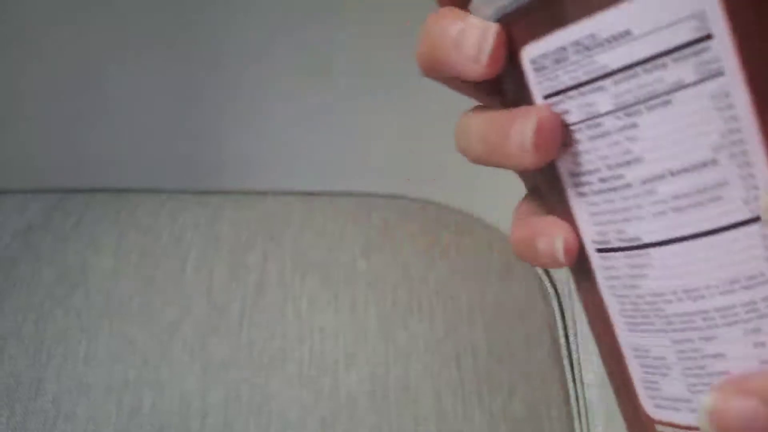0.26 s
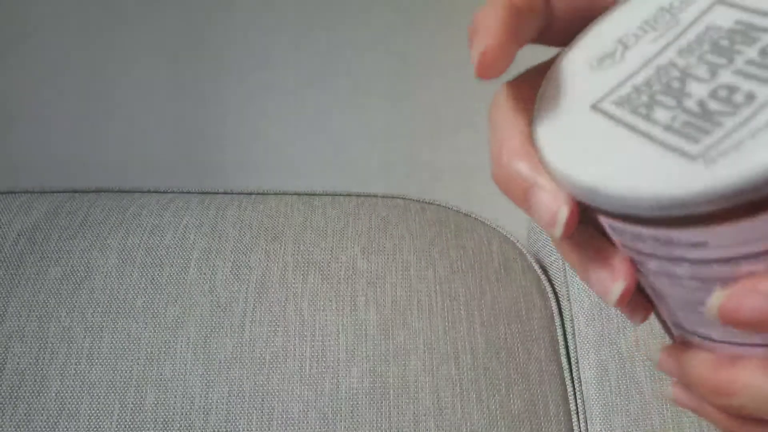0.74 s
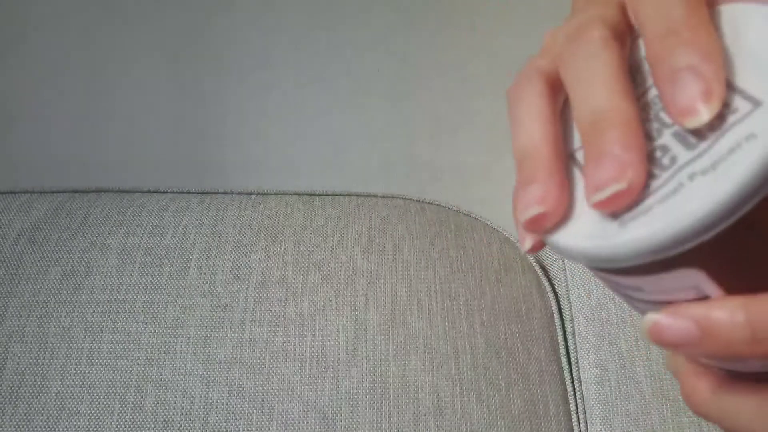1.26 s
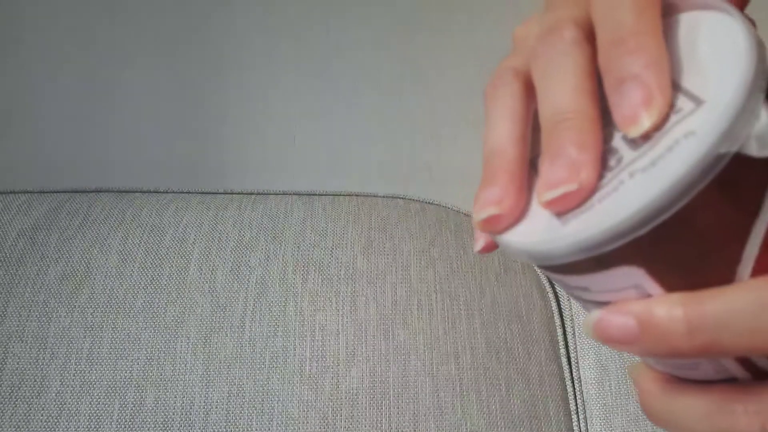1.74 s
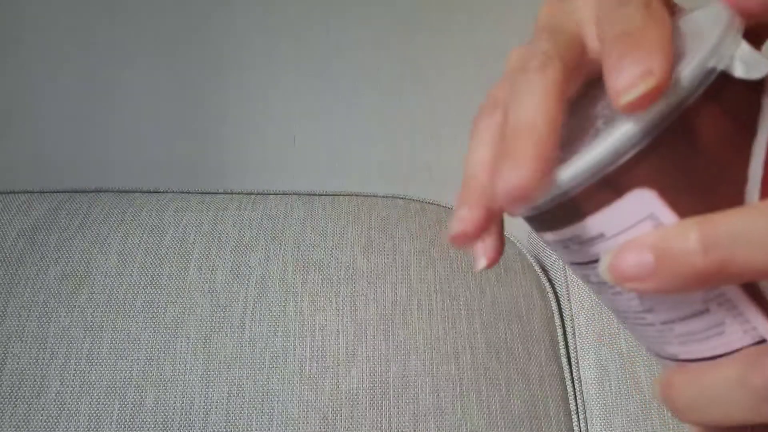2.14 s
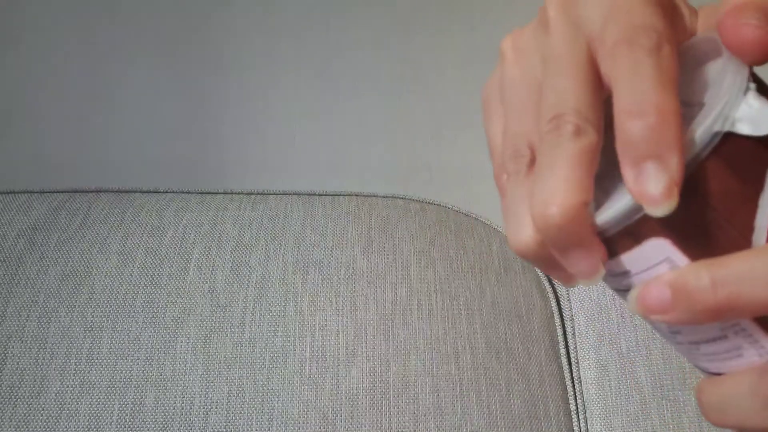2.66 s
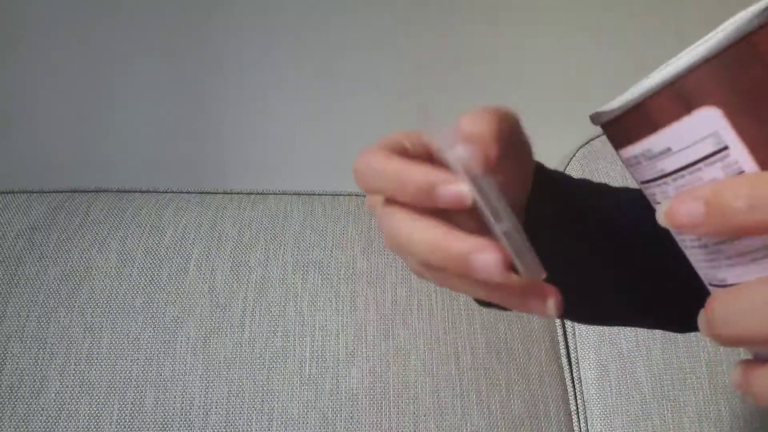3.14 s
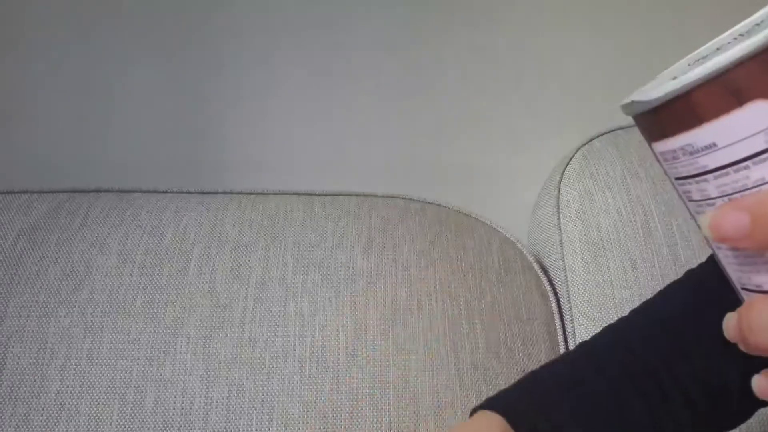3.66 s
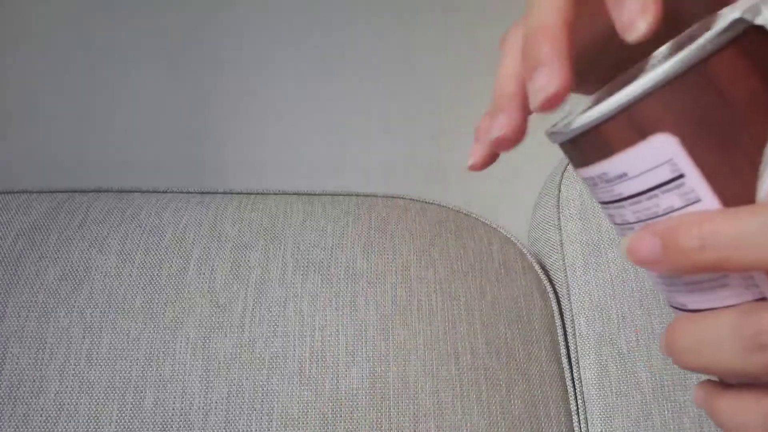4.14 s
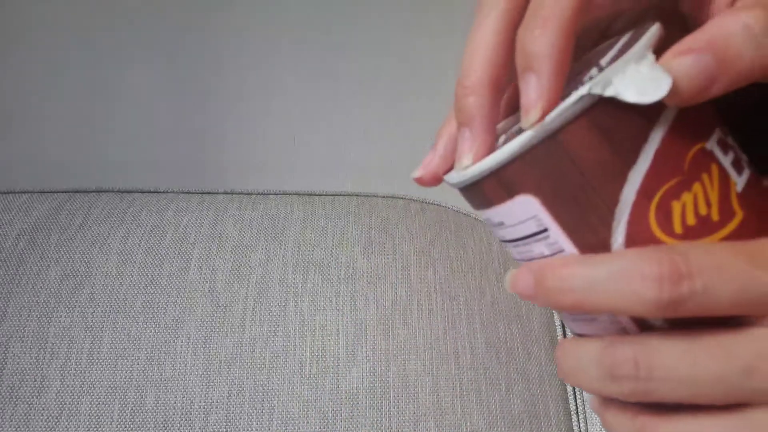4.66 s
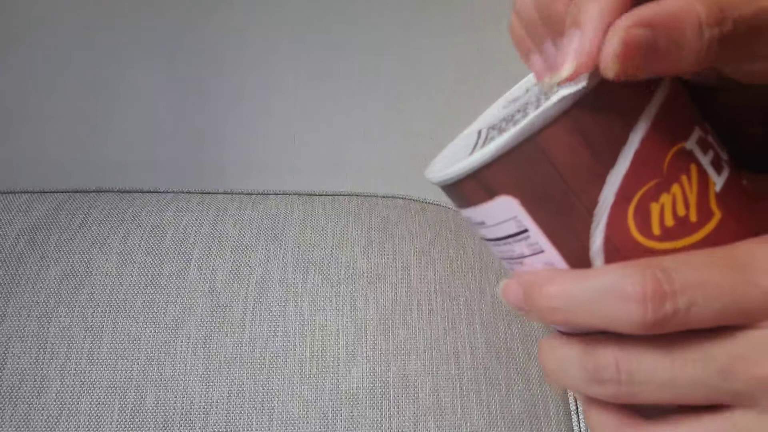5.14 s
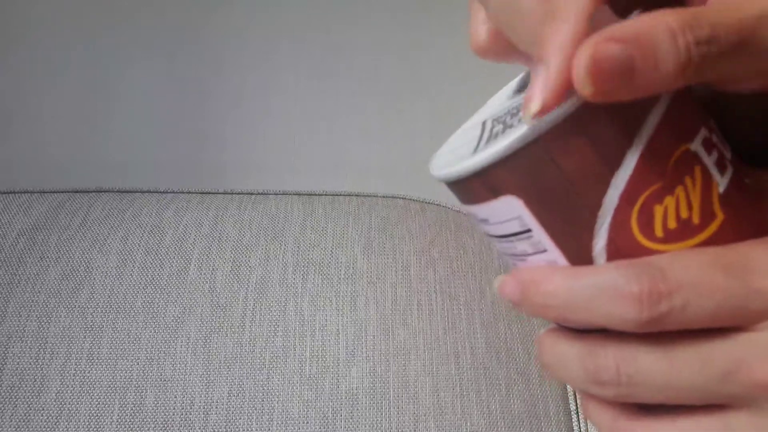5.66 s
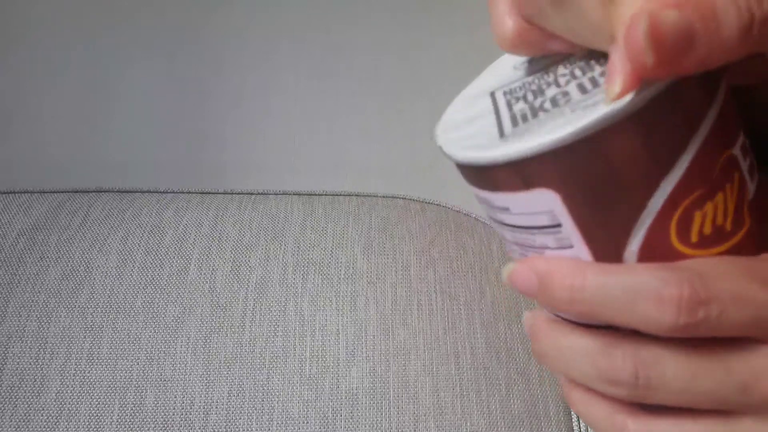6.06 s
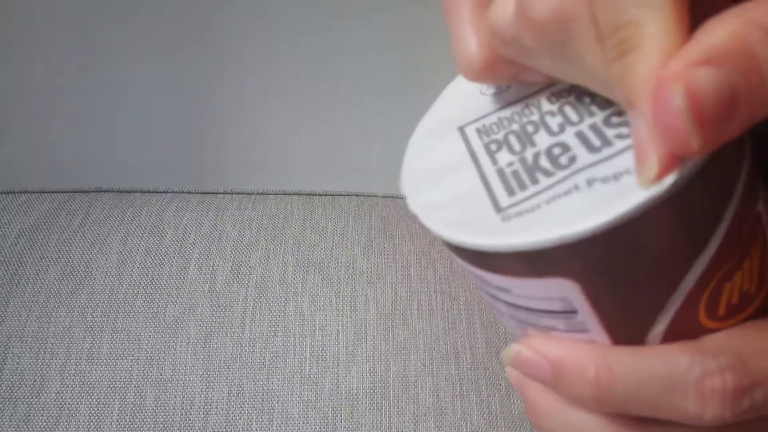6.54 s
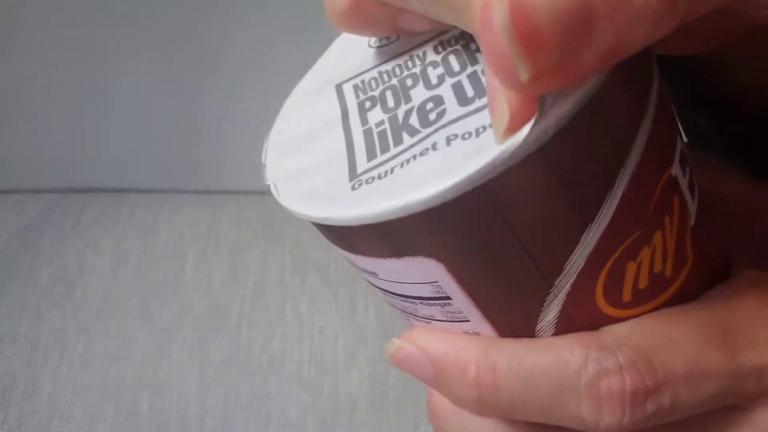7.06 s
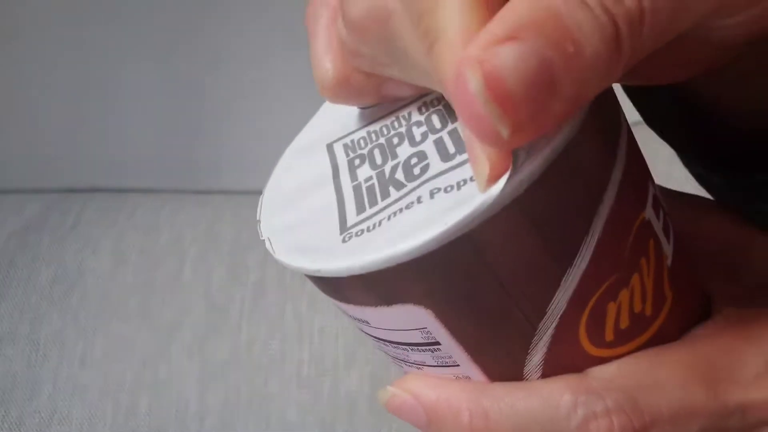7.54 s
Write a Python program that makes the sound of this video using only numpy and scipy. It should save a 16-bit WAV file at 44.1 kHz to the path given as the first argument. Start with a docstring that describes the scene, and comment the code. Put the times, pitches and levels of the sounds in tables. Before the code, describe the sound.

Very close, intimate handling in a small quiet room, leaning left, over faint steady low rumble with a trace of hiss. From 0 to 0.2 s skin swishes brightly across a paper tub, with a soft scuff at 0.5. Hollow knocks and rubbing cluster from 0.75 to 1.2, strongest near 0.95, then it nearly quiets until 2. Hollow taps come at 2.1, a deep thud at 2.34, another at 2.6. At 2.9 a plastic lid grinds briefly and pops free, the loudest crack, its short ring stilled at once, with light rattles to 3.25. A crisp knock and brush at 3.7 lead to soft scuffs until 4.6, under a barely audible dull cushion press. Foil strokes and ticks follow around 5, 5.65 and 6.1; then sparse small taps and clicks at 7 to 7.6 and a faint closing rub.

```python
"""Skin hisses over paper and foil, fingertips scuff and knock on a paper tub, and low house rumble lies under it all.
Near 2.9 s the plastic cap grinds over the rim, springs free and rings briefly; later a forearm leans into a cushion.
Strokes are shaped noise plus tiny ringing slips; knocks and scuffs are short bursts of force that shake the tub.
The cap is jerky noise plus fading tones; rumble and cushion are shaped noise; a soft room answers the hands."""
import sys
import numpy as np
from scipy import signal
from scipy.fft import rfft, irfft, next_fast_len
from scipy.io import wavfile
from scipy.ndimage import uniform_filter1d, map_coordinates

SR = 44100
rng = np.random.default_rng(int(sys.argv[2]) if len(sys.argv) > 2 else 0)


def store_pcm(level_fs):
    """Save levels as 16-bit WAV."""
    pcm = np.round(np.clip(level_fs, -1, 1) * 32767).astype(np.int16)
    wavfile.write(sys.argv[1], SR, np.atleast_2d(pcm).T)


N = 343539  # length in samples


def amp(db):
    """Turn a level in dB into a gain."""
    return 10 ** (np.asarray(db) / 20)


def unit(x):
    """Scale x to an rms of 1."""
    return x / np.sqrt(np.mean(x ** 2) + 1e-20)


def along(points, hz):
    """Read a curve of (pitch_hz, value) points on a log pitch axis."""
    point_hz, value = np.transpose(points)
    return np.interp(np.log(hz + 1), np.log(point_hz + 1), value)


def curves(rows):
    """Join the rows into one value per sample for each column after the time."""
    s, *columns = np.transpose(rows)
    return [np.interp(np.arange(N) / SR, s, column) for column in columns]


def wobble(rate):
    """Draw a smooth random curve with rate random points a second."""
    points = rng.standard_normal(int(N * rate / SR) + 4)
    return map_coordinates(points, [np.arange(N) * rate / SR])


def filtered(x, response):
    """Multiply the spectrum of x by a response of frequency."""
    size = next_fast_len(N + SR // 2)
    hz = np.fft.rfftfreq(size, 1 / SR)
    return irfft(rfft(x, size) * response(hz), size)[..., :N]


def coloured(spectrum):
    """Make noise of rms 1 with a given spectrum."""
    return unit(filtered(rng.standard_normal(N), lambda hz: amp(along(spectrum, hz))))


def wide(spectrum, alike):
    """Make noise from a spread-out source: part shared, part each side's own."""
    share = np.clip(alike, 0, 1)
    own = np.array([coloured(spectrum), coloured(spectrum)])
    return share * coloured(spectrum) + np.sqrt(1 - share ** 2) * own


def modes(table, hz):
    """Add up resonances (pitch_hz, width_hz, level_db) of a struck or pressed object, with alternating sign."""
    total = 0
    for k, (centre, width, db) in enumerate(table):
        resonance = 1j * hz * width / (centre ** 2 - hz ** 2 + 1j * hz * width)
        total = total + (-1) ** k * amp(db) * resonance
    return total


def sides(left_right_db):
    """Gains of left and right for a given level difference."""
    return np.array([amp(left_right_db / 2), amp(-left_right_db / 2)]).reshape(2, -1)


# Colour of the house rumble: pitch_hz, relative level_db per Hz
HOUSE_COLOUR = [(12, -52.5), (20, -10.5), (39, 2), (65, -9), (95, -1.5), (140, -17), (179, -14),
                (217, -17.5), (337, -18.5), (376, -23), (508, -21), (1120, -27.5), (2110, -30.5),
                (2700, -40), (14000, -80)]
# How alike left and right are: pitch_hz, likeness (1 same, -1 opposite)
HOUSE_ALIKE = [(60, 1), (180, 0.81), (550, 0.2), (1650, -0.12), (4970, -0.45), (15000, 0.18)]


def house():
    """Low rumble, near mono, that swells slowly, with faint wide hiss above."""
    def mid_and_side(hz):
        angle = np.arccos(np.clip(along(HOUSE_ALIKE, hz), -1, 1)) / 2
        return amp(along(HOUSE_COLOUR, hz)) * [np.cos(angle), np.sin(angle)]

    mid, side = filtered(rng.standard_normal((2, N)), mid_and_side)
    level_db = -55.5 + 0.65 * wobble(2.136)
    return amp(level_db) * unit(np.array([mid + side, mid - side]))


# A forearm leans into the cushion: time_s, level_db before the lumps
ARM_PRESS = [(3.5, -91), (3.7, -73.5), (4.2, -67.5), (4.6, -64), (4.9, -95)]


def cushion():
    """Dull lumpy rumble of pressed foam: noise through one broad low resonance, twice."""
    foam = unit(filtered(rng.standard_normal(N), lambda hz: modes([(186.3, 200, 0)], hz) ** 2))
    lumps_db = 4.9 * wobble(12)
    return amp(curves(ARM_PRESS)[0] + lumps_db) * foam


# Where the hands are: time_s, left_right_db (for strokes), left_lag_ms, room_answer_db
HAND_PLACE = [(0, -8, -0.113, -7), (1, -7, 0.033, -8.5), (2, -6, -0.031, -8.5), (3, -4, -0.078, -8.5),
              (3.7, -6, 0.245, -8.5), (4.4, -5, 0.2, -9), (5, -9, 0.086, -7.5), (6, -6, 0.065, -10.5),
              (7, -10.5, 0.15, -11.5), (7.79, -11, 0.273, -12)]
# Time the room takes to fade by 60 dB: pitch_hz, fade_s
ROOM_FADE = [(200, 0.2), (2000, 0.15), (10000, 0.16)]
# Colour of what the hands send into the room: pitch_hz, level_db
ROOM_COLOUR = [(200, -5), (1000, 2), (4000, 0.5), (12000, 0.5)]


def room(hands, count=26):
    """Answer each stretch with its own random tail, in which every frequency dies at its own speed."""
    sent = amp(curves(HAND_PLACE)[2]) * hands.mean(axis=0)
    sent = filtered(sent, lambda hz: amp(along(ROOM_COLOUR, hz)))
    out, step = np.zeros((2, N + SR)), N // count + 1
    for start in range(0, N, step):
        hz, t, z = signal.stft(rng.standard_normal((2, SR // 2)), SR, nperseg=256)
        fade_db = -60 * t / along(ROOM_FADE, hz)[:, None]
        tail = signal.istft(z * amp(fade_db), SR, nperseg=256)[1]
        tail = tail / np.linalg.norm(tail[0])
        piece = np.pad(sent[start:start + step], (150, 0))  # the answer starts 150 samples late
        answer = signal.fftconvolve(piece[None], tail, axes=1)
        out[:, start:start + answer.shape[1]] += answer
    return out[:, :N]


def arrive(pair):
    """The sound reaches the nearer microphone first: half the lag delays left, half advances right."""
    shift = curves(HAND_PLACE)[1] * SR / 2000  # half the lag in ms, as samples
    left = map_coordinates(pair[0], [np.arange(N) - shift])
    right = map_coordinates(pair[1], [np.arange(N) + shift])
    return np.array([left, right])


# Strokes of skin over paper and foil: peak_s, swell_s, fade_s, hiss_db,
# sheen_db and scrape_db (both over the hiss), wall_pitch_hz
STROKE_LIST = [(.03, 0.27, 0.088, -49.5, -1.5, -7.5, 2735), (.1, 0.14, 0.088, -53, -3, 1.5, 3170),
               (0.171, 0.13, 0.17, -80.5, -15, 13.5, 872), (0.299, 0.059, 0.106, -64.5, 5.5, -5, 1007),
               (.44, 0.088, 0.09, -76.5, 11.5, -5, 707), (0.519, 0.078, 0.061, -58, -11, -5.5, 684),
               (.64, 0.092, 0.17, -75, -8, -5.5, 703), (.79, 0.079, 0.05, -68, -5, 3.5, 896),
               (.88, 0.073, 0.22, -60, -6, 0, 999), (.935, 0.04, 0.065, -61.5, -16, 12.5, 1480),
               (.97, 0.039, 0.13, -53, -6, -1.5, 1071), (1.01, 0.078, .07, -64, -7, 2.5, 2390),
               (1.08, 0.04, 0.067, -55.5, -4.5, -8.5, 940), (1.21, 0.048, 0.081, -63, -2.5, -5.5, 827),
               (1.35, 0.085, 0.15, -68.5, -5, -6, 669), (2.019, 0.019, 0.072, -67, -15, -11, 960),
               (2.139, 0.097, 0.091, -57, -3, -0.5, 1067), (2.2, 0.12, 0.103, -59.5, -1, 0, 630.5),
               (2.355, 0.013, 0.11, -54.5, -35, -18, 638), (2.63, 0.083, 0.038, -69.5, -16, 0, 609),
               (2.75, 0.097, 0.055, -69.5, -21, 4, 655), (2.99, 0.11, 0.15, -54, -7.5, 0.5, 1360),
               (3.15, .07, 0.075, -68.5, -13, 10.5, 1068), (3.239, 0.072, 0.138, -65, -6.5, -14.5, 1051),
               (3.712, 0.039, 0.12, -51, -10, -1, 1080), (3.8, 0.039, 0.067, -62.5, -21, 2, 791),
               (3.959, 0.042, 0.045, -59.5, -27, 1, 694), (4.065, 0.044, 0.068, -66, -46, 6, 730),
               (4.24, 0.034, 0.069, -61.5, -4, 2, 794), (4.4, 0.11, 0.127, -54, -2, -3.5, 1200),
               (4.559, 0.083, 0.075, -61, -18, -0.5, 780), (4.72, 0.207, 0.58, -68.5, -15, -1.5, 1038),
               (4.981, 0.086, 0.14, -56, -2.5, -4, 2500), (5.33, 0.047, 0.09, -66, -20, 7.5, 1450),
               (5.37, 0.085, 0.036, -60.5, -11.5, 5, 2330), (5.618, 0.02, 0.043, -64, -11, 3.5, 2100),
               (5.674, 0.062, 0.11, -53.5, -3.5, -2.5, 1055), (5.7, 0.097, 0.065, -62, -17, 8, 1530),
               (5.86, 0.15, .12, -72, -21, 9, 1275), (5.962, 0.049, 0.055, -60.5, -9, 2.5, 1187),
               (6.1, 0.23, 0.19, -74.5, -15, 9.5, 2090), (6.361, 0.046, 0.198, -72, -12, -4.5, 702),
               (6.53, 0.035, 0.16, -68, -8, -4.5, 648), (7.051, 0.059, 0.12, -72, -16, -1.5, 597),
               (7.15, .04, 0.18, -71, -9, -2.5, 688), (7.3, .05, 0.103, -68, -7, -9.5, 993),
               (7.8, 0.048, .1, -60.5, -3, 3.5, 1076)]
# Hands that only hold: hiss_db, sheen_db, scrape_db
HOLDING_DB = (-81, -100, -97.5)
STROKE_RANGE_DB = 16  # a stroke gains this over its swell time and loses it over its fade time
STROKE_ROUND = 1.32  # 1 = pointed peak, 2 = bell


def strokes():
    """Gains of hiss, sheen and scrape as strokes swell and fade, and the wall pitch of one stroke at each moment."""
    t = np.arange(0, N + 64, 64) / SR  # one step every 64 samples
    s, swell, fade, db, sheen_db, wall_db, pitch_hz = np.transpose(STROKE_LIST)[..., None]
    distance = np.where(t < s, (s - t) / swell, (t - s) / fade)
    shape_db = db - STROKE_RANGE_DB * distance ** STROKE_ROUND
    power = [amp(shape_db + over_db) ** 2 for over_db in (0, sheen_db, wall_db)]
    lottery = power[2] / rng.exponential(size=power[2].shape)  # louder strokes win more often
    pick = np.argmax(lottery, axis=0)
    gains = [np.sqrt(p.sum(axis=0) + amp(rest) ** 2) for p, rest in zip(power, HOLDING_DB)]
    return *curves(np.transpose([t, *gains])), np.repeat(pitch_hz[pick, 0], 64)


def patchy(pair, patchy_db):
    """Patches of random gain in time and frequency, as the touching skin changes."""
    z = signal.stft(pair, nperseg=256)[2]
    field = uniform_filter1d(rng.standard_normal(z.shape[1:]), size=5, axis=0)
    field = uniform_filter1d(field, size=12, axis=1)
    return unit(signal.istft(z * amp(patchy_db * unit(field)), nperseg=256)[1][:, :N])


def gritty(pair, rate=250):
    """Scattered creases, rate a second, give way in brief bursts that stand above the hiss."""
    creases = (rng.random(N) < rate / SR) * amp(1.3 * rng.exponential(size=N))
    bursts = signal.lfilter([1], [1, 1 / 40 - 1], creases)  # each lasts about 1 ms
    return unit(pair * (1 + 0.2 * bursts))


# Tub wall resonances that move with the grip: pitch_ratio, width_over_pitch, level_db
WALL_MODES = [(0.998, 0.038, 8), (1.601, 0.29, -2.5), (2.4, 0.19, -2.5)]


def scrape(pitch_hz, count=6000):
    """Tiny slips of skin each ring the wall for a few cycles near its present pitch."""
    length = 600  # samples in one slip
    at = rng.integers(N, size=count)
    second = rng.random(count) < .17  # some slips wake the second mode
    ratio = np.where(second, WALL_MODES[1][0], WALL_MODES[0][0])
    hz = pitch_hz[at] * np.exp(0.064 * rng.standard_normal(count)) * ratio
    cycles = hz[:, None] * np.arange(length) / SR
    strength_db = 1.9 * np.minimum(rng.exponential(size=(count, 1)), 4.5)
    grains = amp(strength_db) * np.sin(2 * np.pi * cycles) * cycles * np.exp(-cycles / 2.5)
    index = at[:, None] + np.arange(length)
    return unit(np.bincount(index.ravel(), grains.ravel())[:N])


# Colour of the rubbing hiss: pitch_hz, relative level_db per Hz
HISS_COLOUR = [(880, -31), (1500, -12), (2200, -14), (2550, -5.5), (3620, -8), (3980, -7.5), (5130, -11),
               (7700, -7), (10000, -39), (13000, -52), (22000, -120)]
# Colour of the high sheen: pitch_hz, relative level_db per Hz
SHEEN_COLOUR = [(5000, -25), (8500, 6), (9110, -2.5), (10400, 1), (12500, 4), (14200, -4.5), (16000, -46)]


def slide():
    """Skin on paper and foil: fluttering hiss and sheen over the scraped wall."""
    hiss_gain, sheen_gain, wall_gain, pitch_hz = strokes()
    grip = wobble(70)  # stick and slip shakes all layers together
    hiss = gritty(patchy(wide(HISS_COLOUR, alike=0.31), patchy_db=2.0))
    hiss = hiss * hiss_gain * amp(2.0 * grip + 1.8 * wobble(300))
    sheen = sheen_gain * amp(1.0 * grip + 2.0 * wobble(300)) * wide(SHEEN_COLOUR, alike=0.27)
    wall = wall_gain * amp(1.0 * grip + 3.9 * wobble(22)) * scrape(pitch_hz)
    return sheen + (hiss + wall) * sides(curves(HAND_PLACE)[0])


# The cap grinds over the rim and springs free: time_s, crunch_db before the jerks
POP_LEVEL = [(2.857, -80), (2.877, -52.5), (2.891, -46.5), (2.897, -37), (2.909, -21.5), (2.917, -35),
             (2.94, -42.5), (2.99, -54), (3.12, -82)]
# Colour of the low crunch: pitch_hz, relative level_db per Hz
CRUNCH_COLOUR = [(35, -45), (60, -30.5), (170, -16), (264, -4.5), (378, -10.5), (509, -6), (839, -6),
                 (1090, -7.5), (1240, -7), (1980, -6), (2140, -14.5), (2310, -6), (2500, -8.5),
                 (3250, -34.5), (5500, -120)]
# Colour of the high crackle: pitch_hz, relative level_db per Hz
CRACKLE_COLOUR = [(1470, -24), (2500, -20.5), (2900, -6), (4410, 0), (4800, -4.5), (7950, -3), (9660, -16),
                  (10400, -11.5), (12500, -6.5), (16000, -13.5)]
CRACKLE_DB, CRACKLE_GROWS = -24.5, 0.83  # crackle at the loudest crunch; dB per dB of crunch


def cap_grind():
    """Dense jerky slips of the cap on the rim: noise in two bands that jerk together."""
    low_db, = curves(POP_LEVEL)
    high_db = CRACKLE_DB + CRACKLE_GROWS * (low_db - low_db.max())
    jerk_db = 2.2 * wobble(400) + 1.8 * wobble(90)
    crunch = amp(low_db + jerk_db) * wide(CRUNCH_COLOUR, alike=0.74)
    crackle = amp(high_db + jerk_db) * wide(CRACKLE_COLOUR, alike=0.58)
    first_s, last_s = POP_LEVEL[0][0], POP_LEVEL[-1][0]
    during = abs(np.arange(N) / SR - (first_s + last_s) / 2) < (last_s - first_s) / 2
    return during * (crunch + crackle) * sides(-2.4)


# Ring of the freed cap and tub: pitch_hz, level_db, fade_s (by 60 dB, before the palm), left_right_db
CAP_RING = [(1093, -20.5, 0.14, -4), (531.6, -17.5, 0.064, 2), (114.8, -36.5, 0.076, 16.5)]
CAP_FREE, CAP_CAUGHT = 2.906, 2.934  # s; the palm closes on the cap and stills it
CAUGHT_T60 = .02  # s for the palm to take off a further 60 dB


def cap_ring():
    """The freed cap and tub ring as fading tones until the palm stills them."""
    t = np.maximum(np.arange(N) / SR - CAP_FREE, 0)
    stilled_db = -60 * np.maximum(t + CAP_FREE - CAP_CAUGHT, 0) / CAUGHT_T60
    ring = 0
    for hz, db, t60, left_right_db in CAP_RING:
        tone = amp(db - 60 * t / t60 + stilled_db) * np.sin(2 * np.pi * hz * t)
        ring = ring + tone * sides(left_right_db)
    return ring * (1 - np.exp(-t / 0.00017))  # soft start


# Tub resonances that stay put: pitch_hz, width_hz, level_db
BODY_MODES = [(617, 160, -2.5), (1072, 176, -0.5), (1408, 120, 0), (2290, 260, -11)]
# Nail on foil and cap: pitch_hz, width_hz, level_db
RATTLE_MODES = [(2345, 540, 7), (3280, 660, 7), (4295, 2140, 1)]
# Bright click of the foil: pitch_hz, width_hz, level_db
CLICK_MODES = [(4900, 12500, 0), (9130, 6400, 2)]
# Thinnest foil edge: pitch_hz, width_hz, level_db
TINSEL_MODES = [(12040, 5900, 0)]
GRIP_LOSS_HZ = 72.4  # extra width that the holding hand gives every wall mode
PRESS = 1.12  # how gradually a contact builds: force grows as this power of time
SNAP_SHARE = 0.71  # foil lets go in this share of the contact time
BODY_TILT_DB = 5  # per octave of wall pitch up to 650 Hz: deep thuds wake the tub modes less


def contacts(table, blow, body_db):
    """Each contact is a ragged burst of force, with an optional blow, that shakes the damped wall and the foil."""
    out, size = np.zeros((2, N + SR)), 2 ** 12
    t, hz = np.arange(size) / SR, np.fft.rfftfreq(size, 1 / SR)
    # full contact follows the first touch by 1.6 ms
    strike = blow * np.exp(-((t - .0016) / .00008) ** 2)
    prick = 2.15 * blow * np.exp(-((t - .0016) / .00003) ** 2)
    body, rattle = modes(BODY_MODES, hz), modes(RATTLE_MODES, hz) ** 2
    click, tinsel = modes(CLICK_MODES, hz) ** 2, modes(TINSEL_MODES, hz) ** 2
    for s, db, pitch_hz, rattle_db, click_db, tinsel_db, left_right_db, ms in table:
        u = t / (ms / 1000)  # time in contact times
        v = u / SNAP_SHARE
        rough = rng.standard_normal(size)
        force = rfft(rough * u ** PRESS * np.exp(-u) + strike)
        snap = rfft(rough * v ** PRESS * np.exp(-v) + prick)
        wall = modes([(pitch_hz * ratio, pitch_hz * width + GRIP_LOSS_HZ, level)
                      for ratio, width, level in WALL_MODES], hz)
        flesh = 1 / (1 + 1j * hz / (3 * pitch_hz)) ** 2  # flesh passes little treble into the wall
        small_tub = hz / (hz - .55j * pitch_hz)  # the small tub sends out little bass
        tilt_db = BODY_TILT_DB * np.log2(min(pitch_hz, 650) / 650)
        layers = [(force * flesh * small_tub * wall, 0), (force * body, body_db + tilt_db),
                  (force * rattle, rattle_db), (snap * click, click_db), (snap * tinsel, tinsel_db)]
        hit = 0
        for response, over_db in layers:
            part = irfft(response, size)
            hit = hit + amp(db + over_db) * part / abs(part).max()
        start = round(s * SR)
        out[:, start:start + size] += hit * sides(left_right_db)
    return out[:, :N]


# Soft scuffs: start_s, level_db (peak of the wall layer), wall_pitch_hz,
# rattle_db and click_db (over that peak), left_right_db, contact_ms
SCUFF_LIST = [(0.159, -43.5, 1010, -31, -31, -7, 2.5), (.346, -44.5, 997, -39, -11, -12, 2.4),
              (0.505, -37.5, 676, -6.5, -9, 5, 4.3), (.857, -52.5, 1540, -22, -21, 11, 5.8),
              (0.871, -54, 1500, -9, -15, 0, 2.8), (2.199, -43.5, 610, -17, -20, 5, 2.1),
              (2.737, -46, 580, -28, -23, -5, 3.2), (2.767, -38.5, 580, -44, -38, -3, 2.55),
              (2.9, -22, 369, -10, -14, 1, 1.06), (2.947, -29, 810, -14, -6, 2, 4),
              (2.965, -27, 1720, -24, -25, -6, 4.1), (3.018, -39.5, 1750, -25, -25, -3, 6.6),
              (3.029, -34.5, 1020, -30, -24, -4, 3.8), (3.706, -33.5, 590, -19, -32, -4, 1.8),
              (3.72, -40.5, 620, -18, -14, -1, 4.8), (3.792, -40, 700, -1, -13, -7.5, 8.1),
              (3.938, -41, 685, -5, -31, -6.5, 6.8), (4.047, -45, 710, -7.5, -40, -7, 14),
              (4.165, -50.5, 770, -2.5, -26, -7.5, 8.6), (4.195, -46, 756, -21, -34, -2.5, 5.2),
              (4.242, -54, 764, -19, -21, -7, 4.6), (4.276, -40, 690, -31, -22, -6, 6.5),
              (4.278, -43.5, 1400, -20, -24, -12, 0.9), (4.355, -43, 570, -15, -11, -8, 3.6),
              (4.416, -43.5, 770, -21, -22, -3, 4), (4.439, -47.5, 690, -17, -25, 1, 4.1),
              (4.468, -45.5, 640, -3, -25, -5, 3), (4.515, -45.5, 637, -19, -27, -6, 3.5),
              (4.555, -41, 740, 3, -27.5, -7, 2.2), (4.568, -41.5, 740, 1, -13, -6, 3.4),
              (5.617, -47, 1950, -17, -15, -3.5, 3), (6.079, -47.5, 480, -9, -23, -6, 6.7),
              (6.509, -48.5, 620, -0.5, -6, -4.5, 4.9), (6.601, -54.5, 790, 8, -6, -10.5, 1.9),
              (6.932, -38.5, 567, -12, -27, -5.5, 1.17), (7.071, -35, 593, -3.5, -13, -7, 1.2)]


def scuffs():
    """A fingertip lands and drags: force without a sharp blow; tinsel lies 4.5 dB under the click."""
    rows = [(s, db, hz, rattle, click, click - 4.5, left_right, ms)
            for s, db, hz, rattle, click, left_right, ms in SCUFF_LIST]
    return contacts(rows, blow=0, body_db=-9)


# Hard knocks and snaps: start_s, level_db (peak of the wall layer), wall_pitch_hz,
# rattle_db, click_db and tinsel_db (over that peak), left_right_db
KNOCK_LIST = [(0.569, -62.5, 695, 5, 10, 16.5, -5), (.761, -36.5, 610, -0.5, -2, 3, -6.5),
              (0.782, -34, 1020, -12, -16, -26, 5), (.918, -30, 670, 1.5, -25, -14, 4.5),
              (0.918, -29.5, 1010, -20, -30, -30, -11), (.946, -17.5, 1020, -22, -6, -15.5, -5),
              (.984, -32, 1030, -17, 3.5, -11, -2), (1.019, -39, 1020, -22, 8, 2, -7),
              (1.001, -47, 1100, -7, -10, -14, -1), (1.032, -43, 980, -12, -10, -14, 1),
              (1.048, -44, 910, -16, -15, -12, 12), (1.084, -38.5, 915, -4, -2.5, -10, 3),
              (1.203, -43, 656, -7, -18, -15, -12.5), (1.32, -56.5, 563, 3, 3, 4.5, 3),
              (1.343, -63, 600, .6, 11, 10, 2), (1.45, -60.5, 355, 5.5, 16.5, 8, -5),
              (2.005, -52.5, 770, -18, 18.5, -21, -10), (2.085, -33, 955, -37, -3, -7, -4),
              (2.119, -23.5, 1030, -45, -23, -25, -5), (2.132, -41, 1030, -4, -19, -25, -5),
              (2.144, -46, 1050, -1, -9, -17, -5), (2.337, -15, 371, -14, -4, -34, -3),
              (2.339, -29.5, 1524, -3, -3, -40, -10), (2.369, -30.5, 345, -12, -17, -40, -1),
              (2.593, -59.5, 625, -1, 13.5, -32, 10), (2.611, -23.5, 549, -33, -21, -44, -4),
              (2.9056, -17, 523, -5, -13, -14, 2), (3.127, -35.5, 1320, 2.5, -14, -30, -1),
              (3.133, -37, 1150, -2, -20, -35, -11), (3.155, -51, 1400, -12, -23, -23, -8),
              (3.182, -35, 1040, -26, -36, -35, -6), (3.217, -53, 1070, -2, 16, 0, -4),
              (3.231, -48, 1100, -0.5, 9, -1, -13.5), (3.669, -22, 1280, -4, -2, -20, -1.5),
              (3.683, -38.5, 988, -11, 5.5, -12, -7), (4.537, -46, 750, 0, 8, -17, -6),
              (4.6274, -41, 2120, 12.5, 17.5, 12.5, -9), (5.014, -59, 1190, 6, 16, 4, -9),
              (5.179, -41, 1503, -2, -7, -19, -13), (5.603, -50, 1400, -11, -10, -25, -5),
              (5.664, -33, 1206, -16, -2, -10, -5), (6.113, -29.5, 1030, -20, -2, -16, -9.5),
              (6.153, -46.5, 358, -19, -32, -28, -3), (6.181, -45.5, 425, -13, -31, -45, -2),
              (6.214, -48.5, 457, -4, -30, -45, -9), (6.362, -54, 910, -2, 10, -6, -3),
              (7.015, -35.5, 545, -1.5, -19, -12.5, -14), (7.046, -58, 765, 11, 12, 5, -14),
              (7.073, -40, 1590, -15, -18, -25, -9), (7.132, -33.5, 1046, -4.5, -13, -17, -5),
              (7.155, -45.5, 590, 0.5, 12, -4, -19.5), (7.27, -34, 960, -11, 9.5, -7, -17.5),
              (7.551, -64, 370, 0, 10.5, 18, -22), (7.587, -31, 1350, -19, 6.5, -4, -6),
              (7.59, -37.5, 527, -23, -30, -30, -9)]
KNOCK_MS = 2.43  # contact time of a hard knock


def knocks():
    """Hard knocks and snaps: a sharp blow stands in the ragged force."""
    return contacts([(*row, KNOCK_MS) for row in KNOCK_LIST], blow=1.77, body_db=-5)


def scene():
    """Hands near, with the room, cushion and house behind."""
    hands = slide() + cap_grind() + cap_ring() + scuffs() + knocks()
    return house() + cushion() + room(hands) + arrive(hands)


# Overall colour: pitch_hz, level_db
OVERALL_COLOUR = [(30, -1.5), (14500, 0), (16300, -27)]
TOP_HZ = 16300  # nothing is kept from here up


def record(dry):
    """The top treble falls away steeply, and a sharp band limit removes all above it."""
    return filtered(dry, lambda hz: amp(along(OVERALL_COLOUR, hz)) * (hz < TOP_HZ))


dry = scene()
out = record(dry)
store_pcm(out)
```